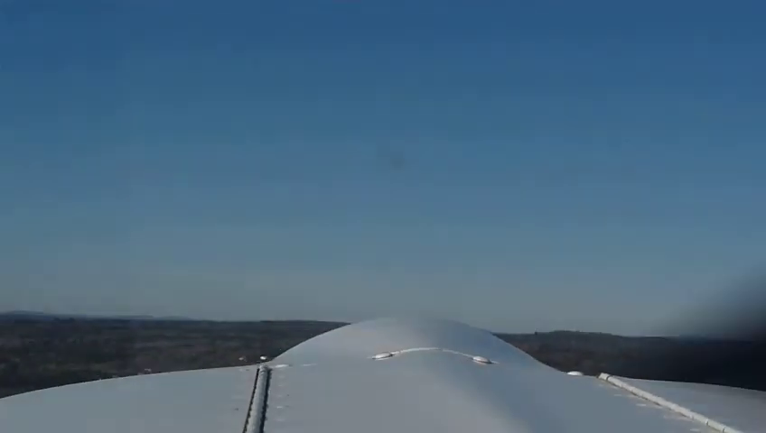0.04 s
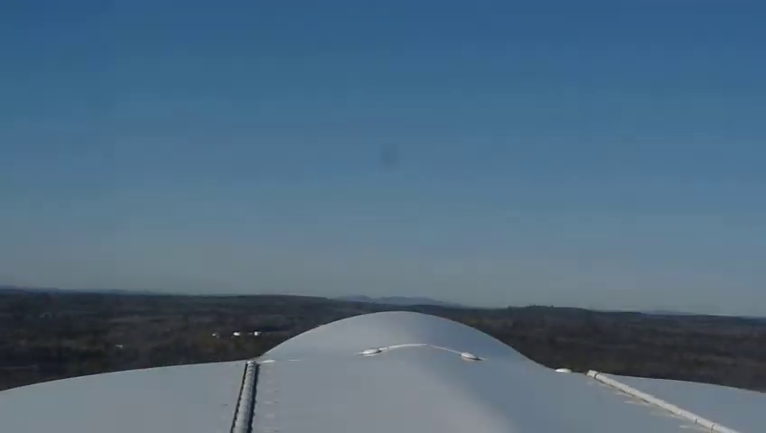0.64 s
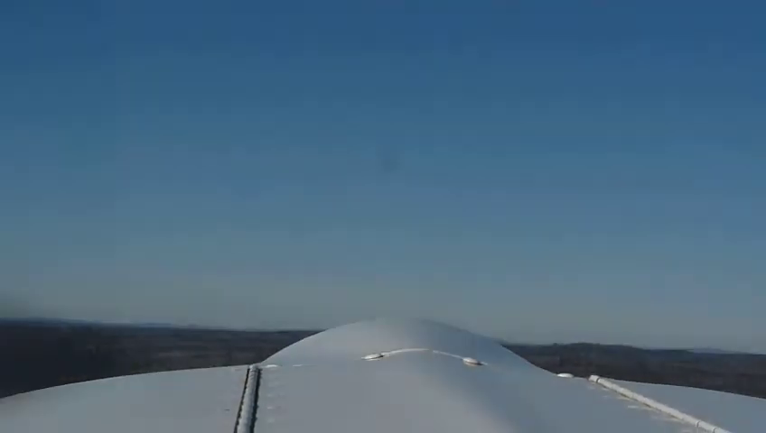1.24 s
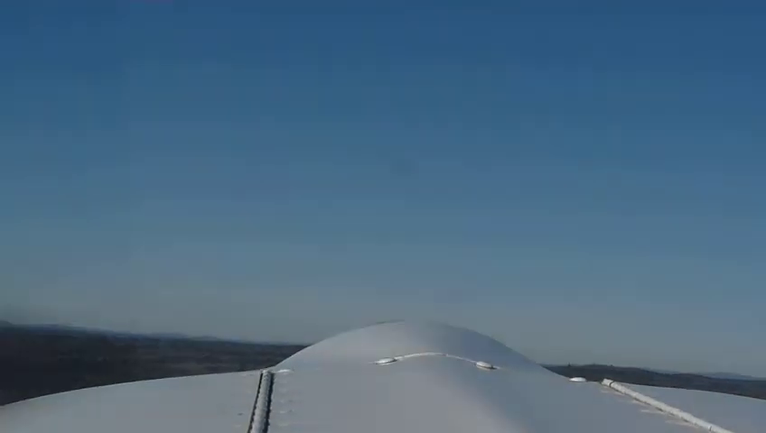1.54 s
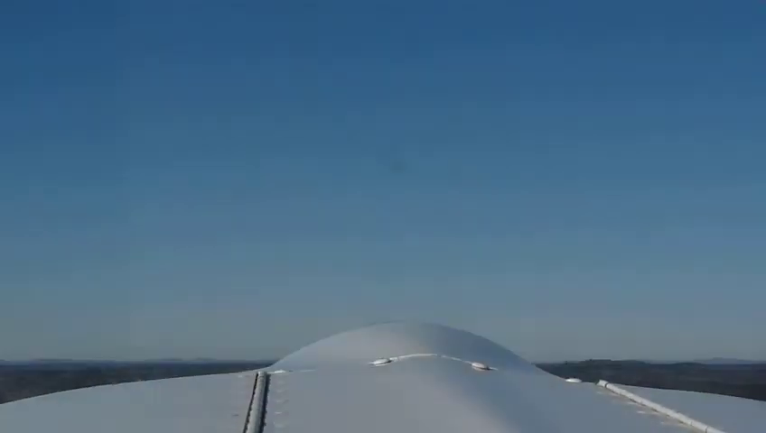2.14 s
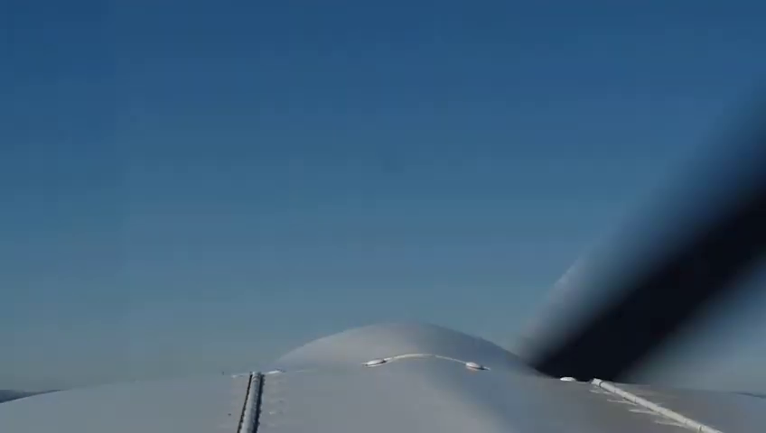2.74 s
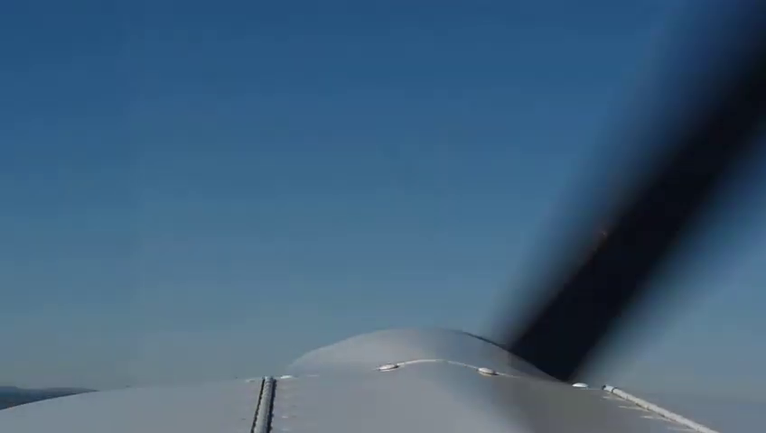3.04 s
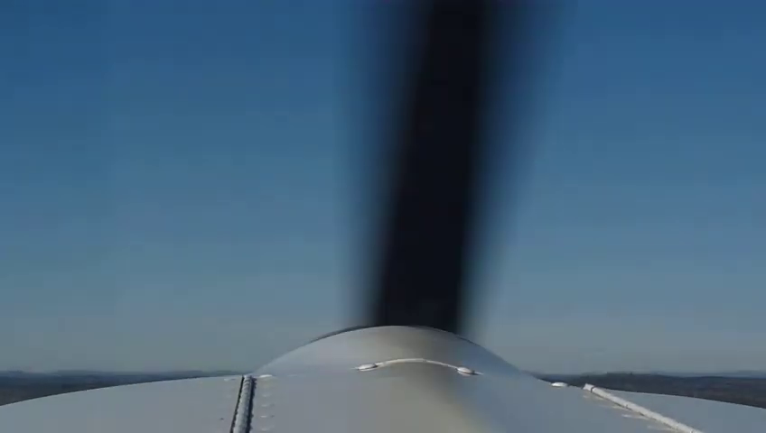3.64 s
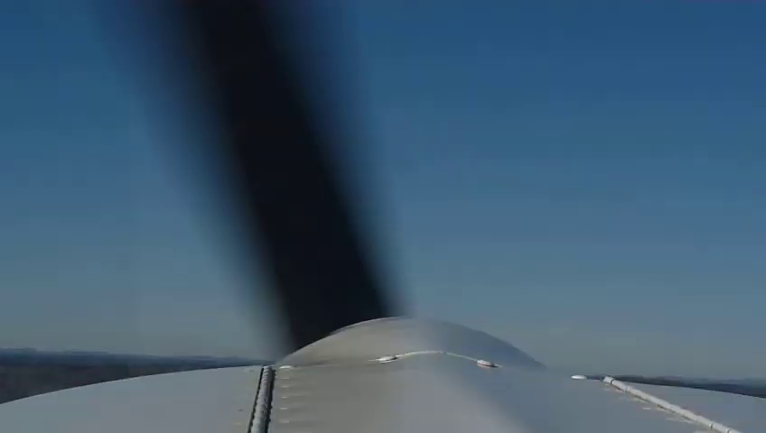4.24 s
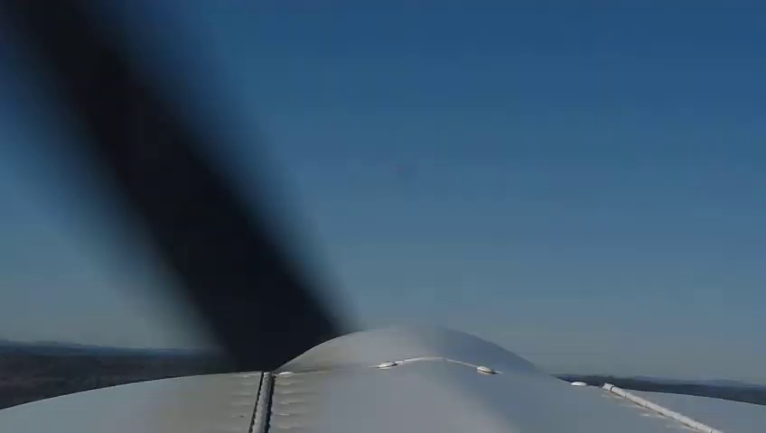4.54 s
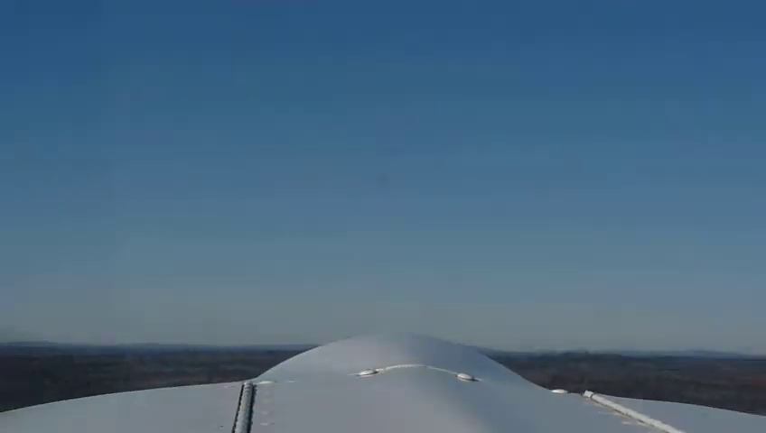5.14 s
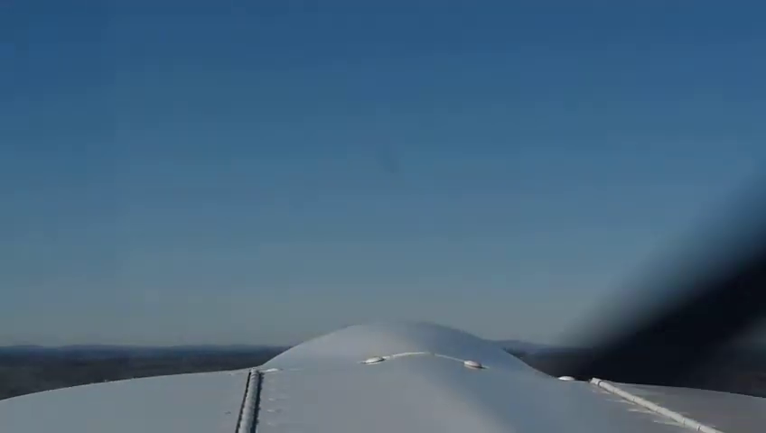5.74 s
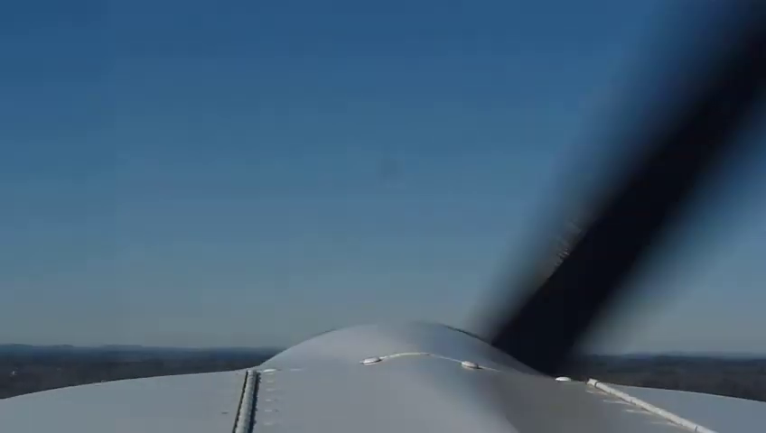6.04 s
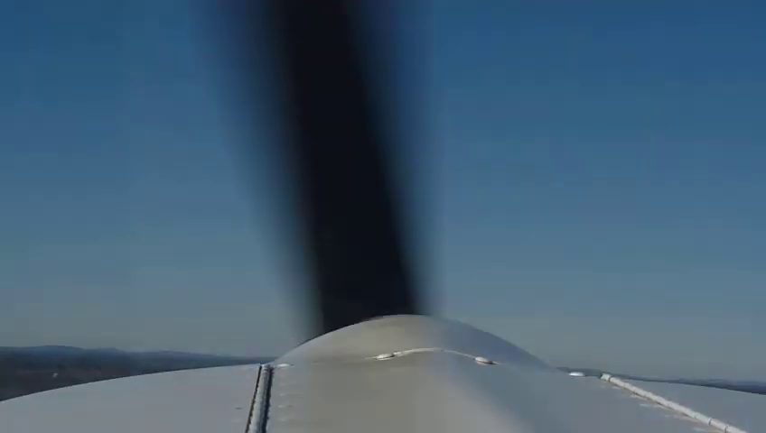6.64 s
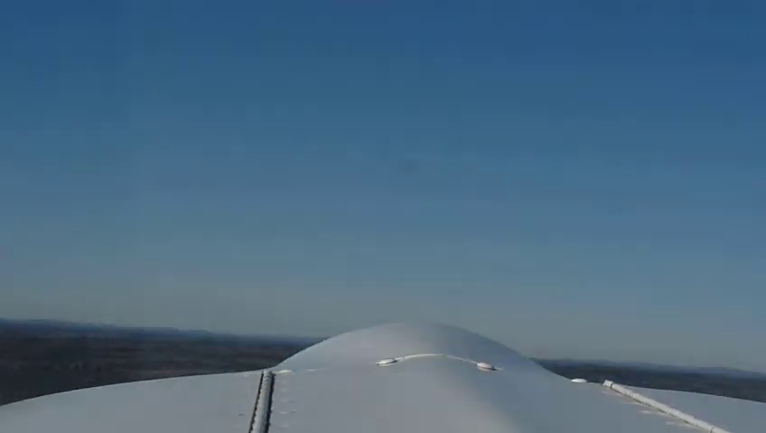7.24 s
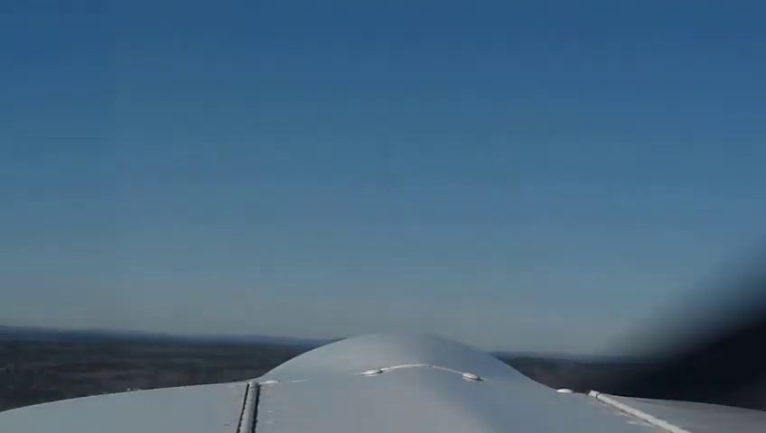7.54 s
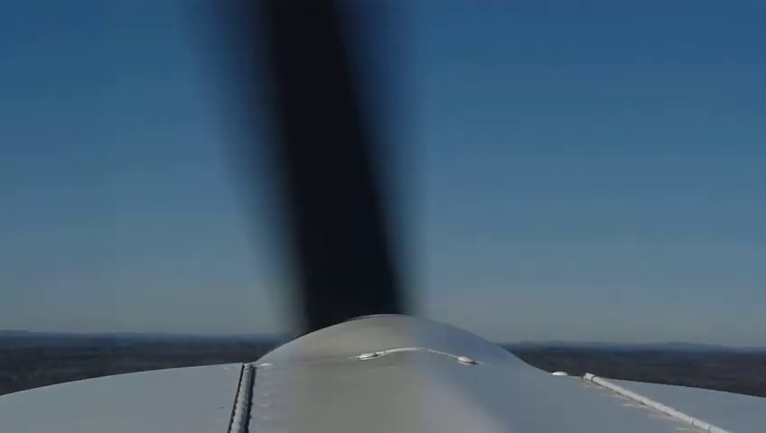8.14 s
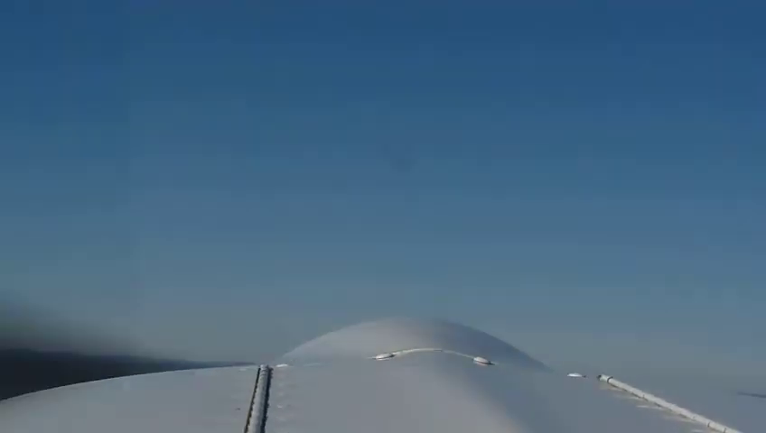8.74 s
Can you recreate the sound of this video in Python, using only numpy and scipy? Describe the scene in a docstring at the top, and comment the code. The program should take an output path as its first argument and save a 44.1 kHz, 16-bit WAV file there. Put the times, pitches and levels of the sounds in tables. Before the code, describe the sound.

From the cockpit of a small climbing plane, the engine and propeller drone loud and low from start to finish. The pitch barely changes, though the tone gently throbs. Underneath are an uneven exhaust burble, a buzz from the cabin panels and the roar of passing air. It all sounds close, somewhat muffled and a little distorted on a small microphone.

```python
"""Inside the cockpit of a light aircraft in a steady climb: a four-cylinder engine turns a two-blade prop.
From the start, firings and blade passes make one deep drone; unequal cylinders add a burble and make
the cabin panels buzz, and slipstream rushes past. Each pressure crest overloads the small microphone
and chokes the buzz and air for an instant. As the climb goes on, a hum in the drone swells and ebbs
about once a second, and the engine slows a little under the load."""
import sys
import numpy as np
from scipy.fft import rfft, irfft, next_fast_len
from scipy.io import wavfile
from scipy.ndimage import map_coordinates

SR = 44100
rng = np.random.default_rng(int(sys.argv[2]) if len(sys.argv) > 2 else 0)


def to_wav(s):
    """Save 16-bit WAV."""
    ch = np.atleast_2d(s).T  # columns
    pcm = np.round(np.clip(ch, -1, 1) * 32767)  # PCM
    wavfile.write(sys.argv[1], SR, pcm.astype(np.int16))


N = 392490

# the hum at twice the firing rate, swelling and ebbing: time_s, level_db
HUM_LEVELS = [(0.0, -26), (0.18, -31.5), (1.05, -29), (1.17, -40), (1.38, -25.5), (1.62, -32.5),
              (1.8, -24.6), (2.25, -33.5), (2.37, -27.5), (3.09, -25.5), (3.33, -35), (3.45, -30.5),
              (4.59, -26), (5.01, -29.5), (5.73, -23.5), (5.94, -28.7), (7.14, -23), (7.89, -33),
              (8.25, -24.3), (8.88, -26.5)]
# the third harmonic, swelling on its own: time_s, level_db
THIRD_LEVELS = [(0.0, -36.5), (0.3, -43.5), (0.45, -30.6), (0.99, -36.5), (1.26, -27.5), (2.13, -34),
                (2.4, -28.8), (3.6, -33), (5.37, -30), (5.67, -39), (6.6, -28), (6.84, -35), (8.64, -32),
                (8.88, -31.5)]
# upper overtones and how far each rides the hum: firing_multiple, level_db, db_per_hum_db
OVERTONE_LEVELS = [(4, -32.5, .29), (5, -39.5, 0), (6, -39.5, 0.65)]
# slow swells and dips of single overtones: centre_s, firing_multiple, half_length_s, gain_db
OVERTONE_SWELLS = [(.1, 5, 0.16, 9.5), (1.25, 4, 0.21, -7.5), (6.852, 5, 0.21, 10), (7.15, 4, .4, -4.5),
                   (8.403, 4, .25, 3), (8.554, 6, .25, -6.5)]
# exhaust tones between and above the drone's harmonics: cycle_multiple, level_db
EXHAUST_TONES = [(2, -57), (5, -44), (6, -45.5), (7, -47), (9, -33), (10, -42), (11, -37.5), (13, -44.5),
                 (15, -45.5), (17, -44), (18, -39.5), (19, -38), (21, -43.5), (22, -49), (26, -48),
                 (27, -48.5), (28, -46.5), (29, -51.5), (30, -53.5), (31, -50), (32, -53.5), (33, -52)]
# airflow over the cabin, played as a swing about its mean: time_s, level_db
AIRFLOW_LEVELS = [(0.0, -33), (2.13, -32.5), (3.42, -32.5), (3.93, -31.3), (4.89, -33), (5.04, -31.5),
                  (5.58, -33), (5.88, -31), (6.03, -33), (7.02, -30.5), (7.29, -35), (7.5, -31.3),
                  (7.65, -32.2), (8.28, -31.5), (8.43, -34.5), (8.88, -32)]
# buzz tones that hit a panel resonance: cycle_multiple, level_db
PANEL_RESONANCES = [(39, -54.5), (40, -54.5), (43, -53.5), (44, -51.5), (47, -52), (52, -50), (53, -52.5),
                    (55, -51.5), (58, -54.5), (64, -58.5), (70, -60.5), (72, -54.5), (74, -55.5),
                    (78, -52.5), (79, -58), (80, -56), (82, -58.5), (83, -55.5), (85, -59.5), (89, -59.5),
                    (90, -56.5), (97, -63.5), (98, -63)]
# the bed of all other buzz tones: pitch_hz, level_per_tone_db
BUZZ_BED = [(700, -60), (1000, -55.5), (1250, -63.5), (1400, -66), (1650, -66), (1800, -72.5),
            (2000, -73.5), (2400, -68), (2800, -82.5)]
# colour of the low roar on the hull: frequency_hz, relative_db
ROAR_SPECTRUM = [(20, -29), (50, -18), (100, -3), (135, -3), (175, 3.5), (235, 1), (290, -2.5), (350, -0.5),
                 (420, -2), (465, -7), (510, -3), (600, -19.5), (750, -24.5), (2000, -77.5)]
# colour of the propeller wash on the windscreen: frequency_hz, relative_db
WASH_SPECTRUM = [(300, -29.5), (520, 3.5), (620, -0.5), (750, -1.5), (900, -3), (1100, -8), (2000, -47.5)]
# colour of the bright rush along the cabin: frequency_hz, relative_db
RUSH_SPECTRUM = [(600, -22.5), (900, -6), (1100, 0), (1400, -3), (1630, -1), (1790, -6), (1880, -2),
                 (2150, -11.5), (2400, -12.5), (2800, -14.5), (3500, -13), (4500, -14), (8000, -31.5)]
# colour of the camera's hiss: frequency_hz, relative_db
HISS_SPECTRUM = [(100, 0.0), (7200, -1.5), (8000, -5.5), (8600, -13), (9500, -59.5)]

FIRING_START_HZ, SAG_HZ_PER_S, HUNT_HZ = 83.4, .095, .07
BOOM_DB, BOOM_DUCK_PER_HUM_DB = -24, .19  # the fundamental gives way as the hum grows
ROAR_DB, WASH_DB, RUSH_DB = -28, -37, -41.5  # in mean airflow, before the choke
BUZZ_PER_AIR_DB, WASH_PER_AIR_DB, RUSH_PER_AIR_DB = .54, 1.1, .62  # dB gained for each dB of airflow
HISS_DB, WHINE_DB, WHINE_HZ = -67.5, -85.5, 6665
BASS_CUT_HZ, TOP_CUT_HZ = 48, 8300


def amp(db):
    """Decibels to gain."""
    return 10 ** (np.asarray(db) / 20)


def level_at(spectrum, hz):
    """Read a spectrum's dB at hz, on a log frequency axis."""
    points_hz, db = np.transpose(spectrum)
    return np.interp(np.log(hz + 1), np.log(points_hz + 1), db)


def fader(levels):
    """A level in dB for every sample, from (time_s, level_db) points."""
    time_s, db = np.transpose(levels)
    return np.interp(np.arange(N) / SR, time_s, db)


def swing(levels):
    """A fader move in dB about its own mean."""
    db = fader(levels)
    return db - db.mean()


def wobble(rate_hz):
    """A smooth random curve with rate_hz knots a second."""
    coarse = np.linspace(0, N, 4096)
    knots = rng.standard_normal(4096)
    smooth = map_coordinates(knots, [coarse * rate_hz / SR], mode="wrap")
    return np.interp(np.arange(N), coarse, smooth)


def filtered(x, response):
    """Equalise x with a gain given as a function of Hz."""
    size = next_fast_len(N + SR // 2)
    return irfft(rfft(x, size) * response(np.fft.rfftfreq(size, 1 / SR)), size)[:N]


def noise(spectrum):
    """Coloured noise of rms 1."""
    x = filtered(rng.standard_normal(N), lambda hz: amp(level_at(spectrum, hz)))
    return x / np.sqrt(np.mean(x ** 2) + 1e-20)


def engine_tones(cycle, tones, wander, drift_hz, size=8192, layers=4):
    """Tones (cycle_multiple, level_db) locked to the engine; each drifts in strength and phase."""
    multiple, db = np.transpose(tones)

    def pattern():
        bins = np.zeros(size // 2 + 1, complex)
        bins[np.rint(multiple).astype(int)] = amp(db) * np.exp(2j * np.pi * rng.random(len(db)))
        one_cycle = irfft(bins) * size / np.sqrt(2)
        return np.interp(cycle % 1 * size, np.arange(size), one_cycle)

    steady = pattern()
    drifting = sum(wobble(drift_hz) * pattern() for _ in range(layers)) / np.sqrt(layers)
    return (steady + wander * drifting) / np.hypot(1, wander)


def engine_cycle():
    """Four-stroke cycles run so far, four firings each; the speed sags in the climb and hunts slowly."""
    firing_hz = FIRING_START_HZ - SAG_HZ_PER_S * np.arange(N) / SR + HUNT_HZ * wobble(2)
    return np.cumsum(firing_hz) / SR / 4


def drone(cycle):
    """Firings and blade passes, four a cycle, make a boom and overtones that sway in the turbulence."""
    t = np.arange(N) / SR
    hum_swing_db = swing(HUM_LEVELS)
    levels_db = {2: fader(HUM_LEVELS), 3: fader(THIRD_LEVELS)}
    for harmonic, db, follow in OVERTONE_LEVELS:
        levels_db[harmonic] = db + follow * hum_swing_db
    for centre_s, harmonic, half_s, db in OVERTONE_SWELLS:
        levels_db[harmonic] += db * np.exp(-((t - centre_s) / half_s) ** 2)
    phase = 2 * np.pi * 4 * cycle
    boom_db = BOOM_DB - BOOM_DUCK_PER_HUM_DB * hum_swing_db + .8 * wobble(25)
    wave = amp(boom_db) * np.cos(phase + .048 * wobble(18))
    for harmonic, db in levels_db.items():
        polarity = 1 if harmonic == 2 else -1  # the hum builds each crest, higher overtones flatten it
        gain = amp(db + 1.3 * wobble(14))
        wave += polarity * gain * np.cos(harmonic * phase + .12 * wobble(7))
    return np.sqrt(2) * wave


def exhaust_burble(cycle):
    """Unequal cylinders give the exhaust a lumpy pattern that comes round once a cycle."""
    return engine_tones(cycle, EXHAUST_TONES, wander=.45, drift_hz=6)


def panel_buzz(cycle, air_db):
    """High engine orders shake the panels, harder in stronger airflow; those on a resonance stand out."""
    multiples = np.arange(34, 135)
    cycle_hz = cycle[-1] * SR / N
    levels_db = dict(zip(multiples, level_at(BUZZ_BED, multiples * cycle_hz)))
    levels_db.update(PANEL_RESONANCES)
    buzz = engine_tones(cycle, list(levels_db.items()), wander=.5, drift_hz=4)
    return amp(BUZZ_PER_AIR_DB * air_db) * buzz


def slipstream(cycle, air_db):
    """Turbulence roars on the hull, prop wash beats on the windscreen, fast air rushes along the cabin."""
    # each blade throws a puff of air just after the pressure crest
    puff_db = .7 * np.cos(2 * np.pi * (4 * cycle - .3))
    gust_db = wobble(70)
    roar = amp(ROAR_DB + .87 * wobble(11)) * noise(ROAR_SPECTRUM)
    wash = amp(WASH_DB + WASH_PER_AIR_DB * air_db + gust_db) * noise(WASH_SPECTRUM)
    rush = amp(RUSH_DB + RUSH_PER_AIR_DB * air_db + puff_db + 1.3 * gust_db) * noise(RUSH_SPECTRUM)
    return roar + wash + rush


def overload(pressure, limit_db):
    """Gain left for small sounds while pressure drives the microphone against its one-sided limit."""
    return 1 / (1 + (np.maximum(pressure, 0) / amp(limit_db)) ** 8)


def saturate(x, ceiling_db):
    """The microphone rounds off the highest peaks."""
    return x / (1 + (x / amp(ceiling_db)) ** 8) ** (1 / 8)


def muffle(x, edge_hz, order):
    """The microphone's response rolls off above edge_hz."""
    return filtered(x, lambda hz: 1 / np.hypot(1, (hz / edge_hz) ** order))


def scene():
    """Drone and burble carry the mix; buzz and slipstream duck under each crest."""
    cycle = engine_cycle()
    engine = drone(cycle)
    burble = exhaust_burble(cycle)
    air_db = swing(AIRFLOW_LEVELS) + .25 * wobble(5.4)
    buzz = panel_buzz(cycle, air_db)
    air = slipstream(cycle, air_db)
    # the deepest part of the pressure moves the diaphragm furthest
    diaphragm = muffle(engine + .5 * burble, edge_hz=170, order=3)
    choke = overload(diaphragm, limit_db=-21.5)
    pressure = engine + burble + choke * (buzz + air)
    return muffle(saturate(pressure, ceiling_db=-7.5), edge_hz=2483, order=5)[None]


def record(dry):
    """The camera adds its own hiss and a thin whine, and cuts the deep bass and the top."""
    hiss = amp(HISS_DB) * noise(HISS_SPECTRUM)
    whine_phase = 2 * np.pi * WHINE_HZ * np.arange(N) / SR + .5 * wobble(20)
    whine = amp(WHINE_DB) * np.sqrt(2) * np.sin(whine_phase)
    bass_cut = lambda hz: hz ** 3 / np.hypot(hz ** 3, BASS_CUT_HZ ** 3)
    top_cut = lambda hz: 1 / (1 + (hz / TOP_CUT_HZ) ** 60)
    return filtered(dry[0] + hiss + whine, lambda hz: bass_cut(hz) * top_cut(hz))[None]


dry = scene()
out = record(dry)
to_wav(out)
```